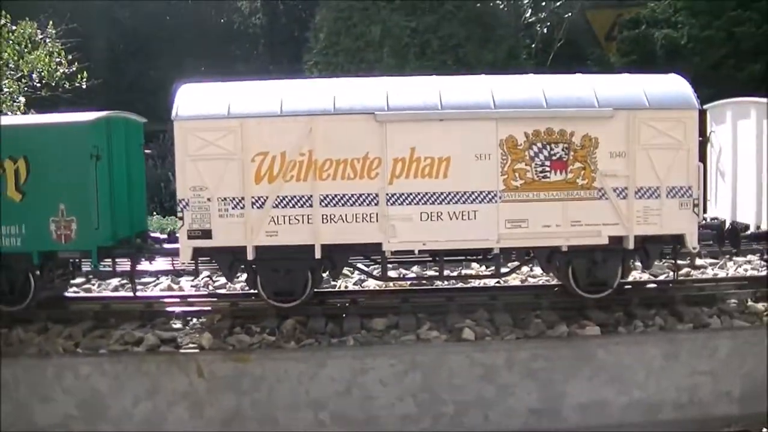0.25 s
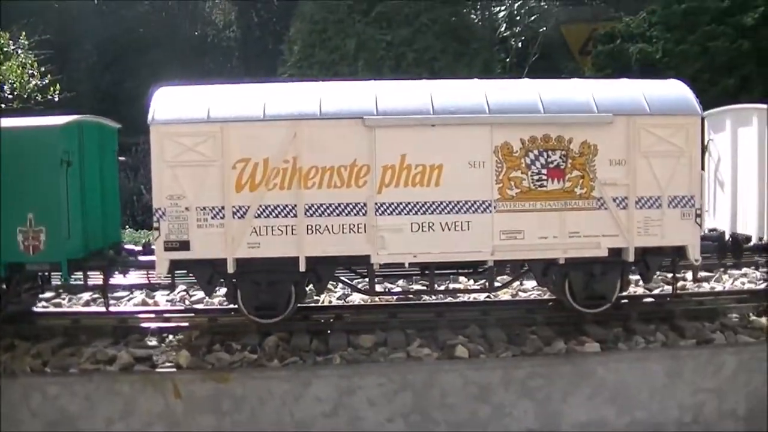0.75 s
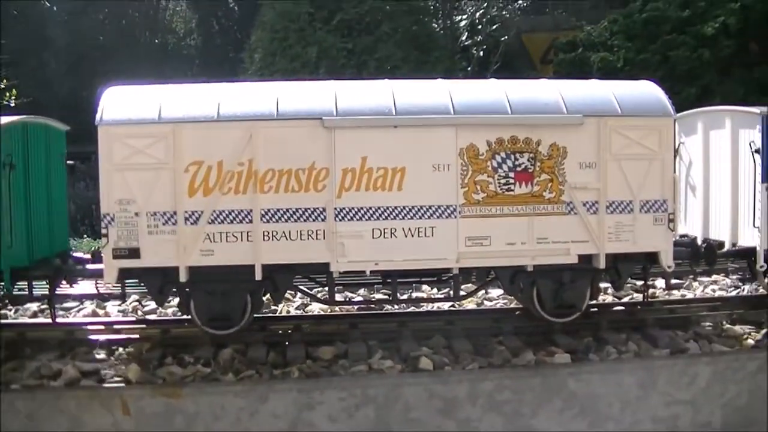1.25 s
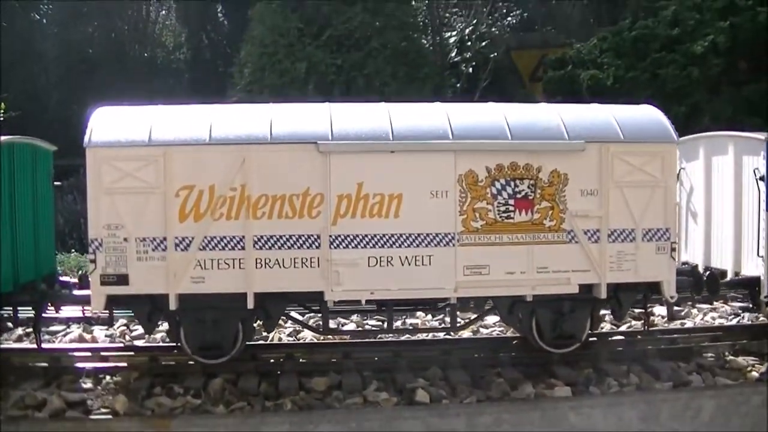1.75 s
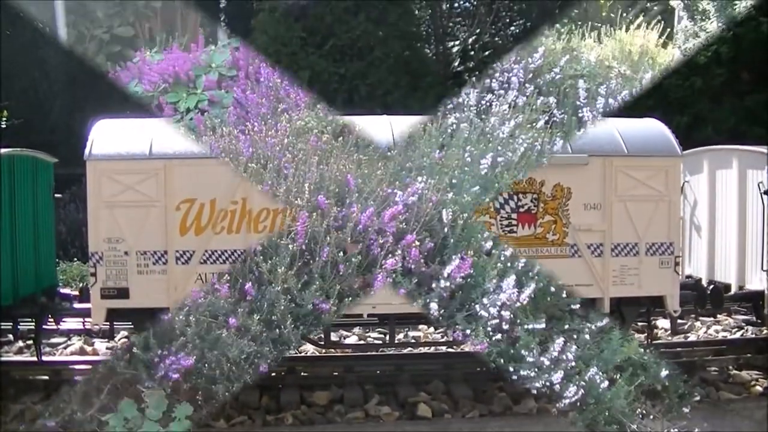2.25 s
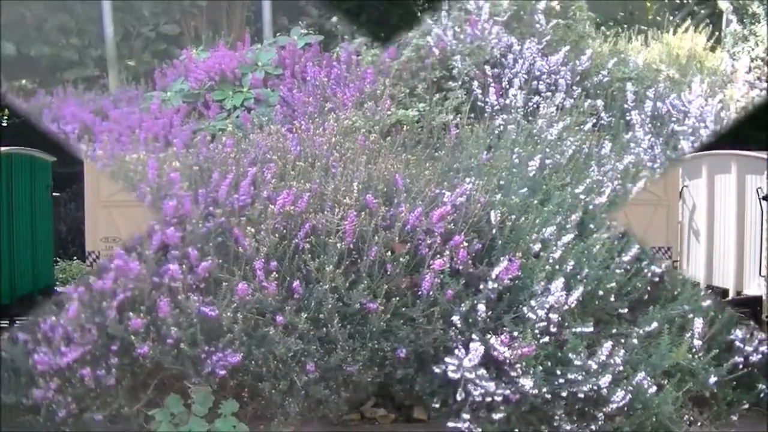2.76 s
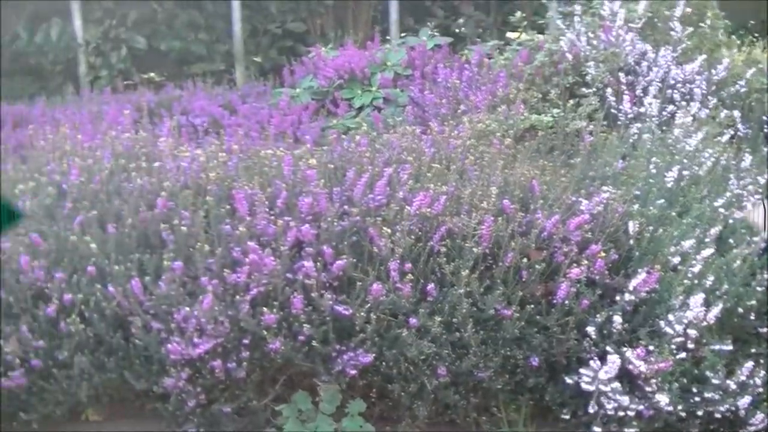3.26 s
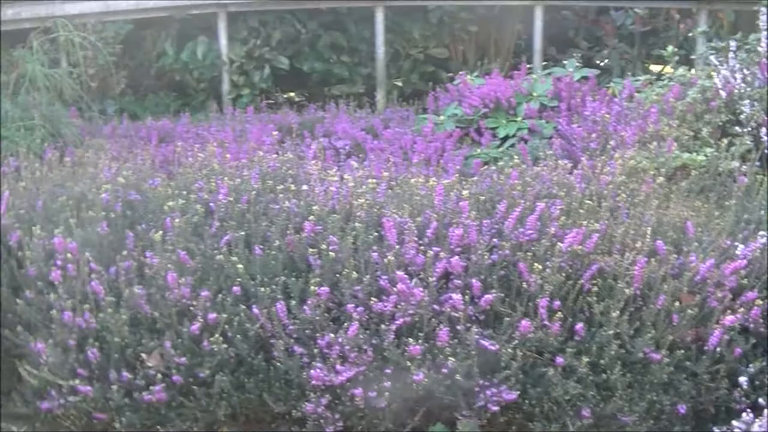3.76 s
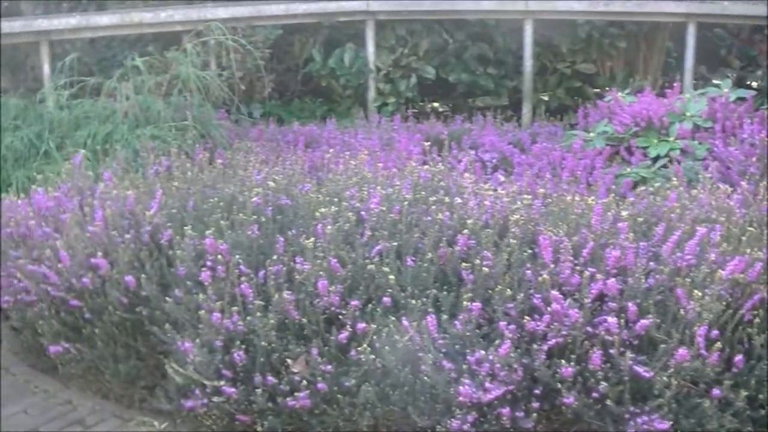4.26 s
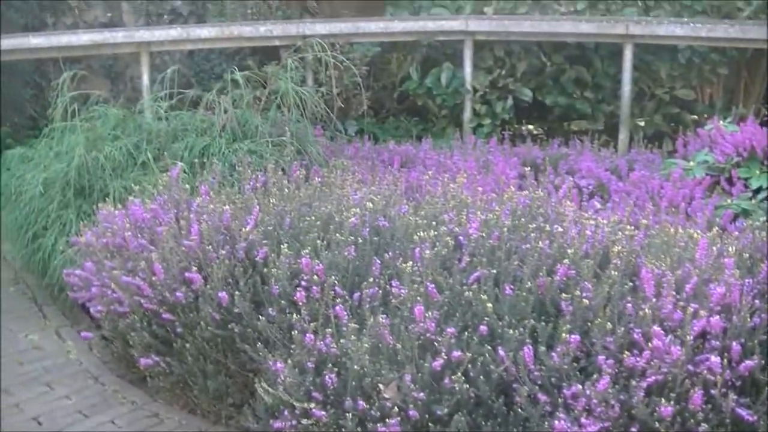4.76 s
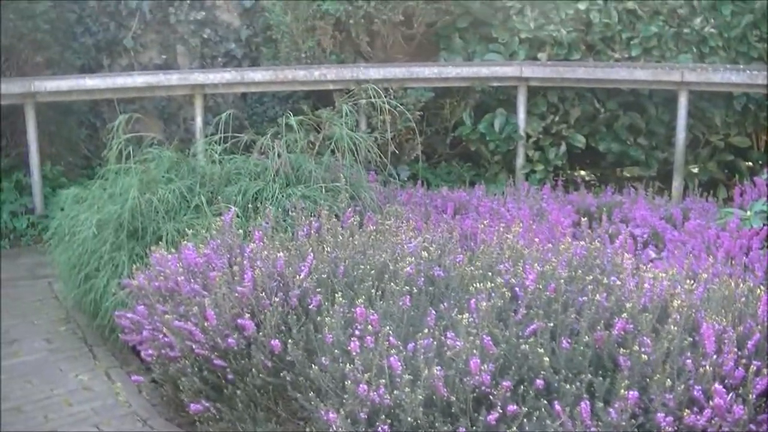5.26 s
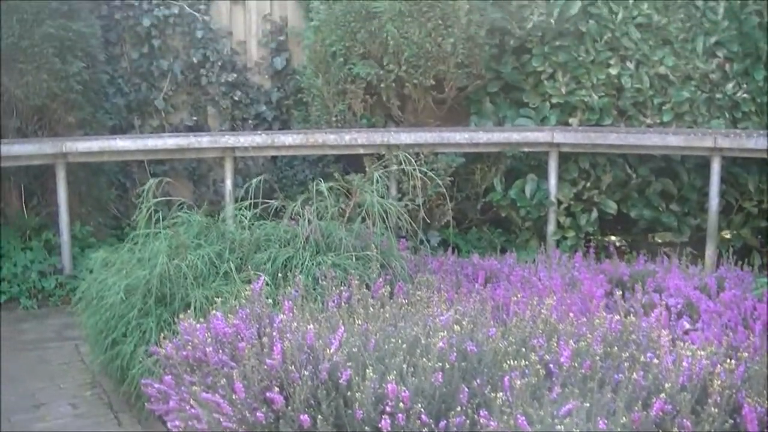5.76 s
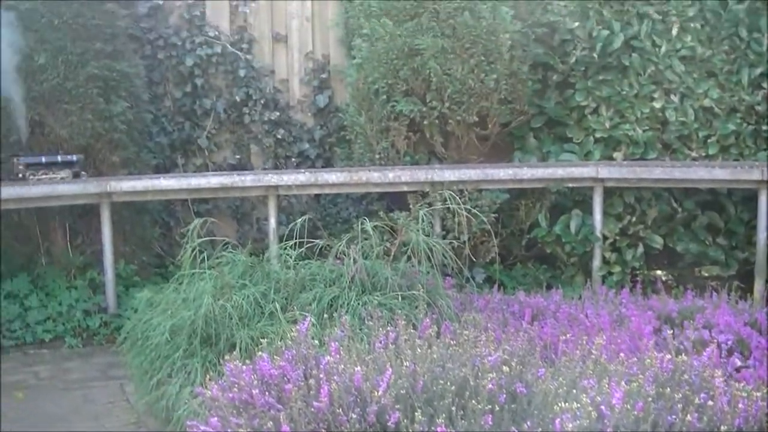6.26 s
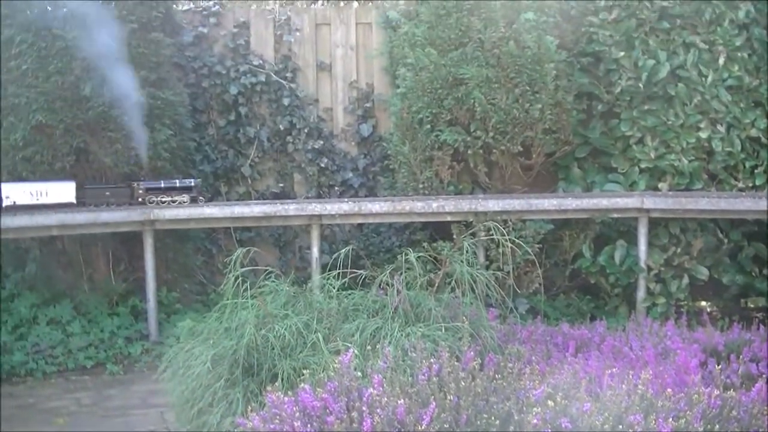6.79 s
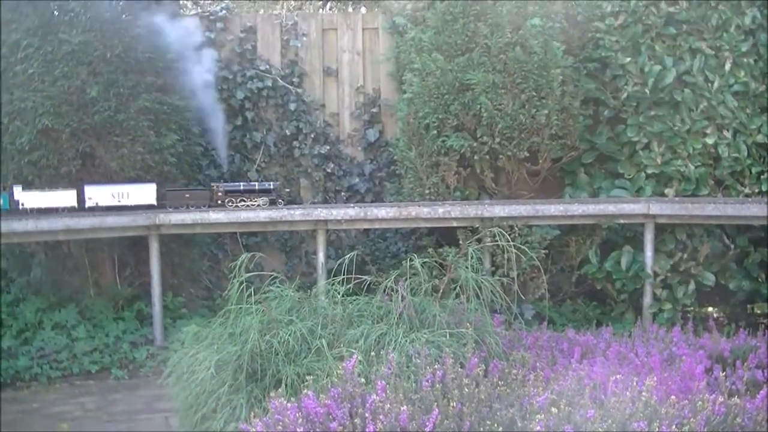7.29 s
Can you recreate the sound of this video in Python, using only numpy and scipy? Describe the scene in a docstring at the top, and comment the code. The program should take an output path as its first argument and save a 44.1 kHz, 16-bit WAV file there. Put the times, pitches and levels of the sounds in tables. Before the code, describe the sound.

Close blackbird whistles and twitters over faint rolling model wagons, then a small steam engine hisses in wet, sputtering spurts with sharp spitting pops.

```python
"""A garden railway, heard in two views. First, wagon wheels and a faint whine: coloured turbulent noise and
a narrow resonance. Close by, a blackbird whistles and twitters (gliding tones, roughened by random
modulation); seesaw calls, chatter and a trill come from far off. Then the air brightens for a wider view: a
live-steam engine with a rushing burner (noise and flue resonances), spurts of wet steam (gated jet noise
with droplet impulses) and water spitting on hot metal (noise snaps with damped sines)."""
import sys
import numpy as np
from scipy import signal
from scipy.fft import rfft, irfft, next_fast_len
from scipy.io import wavfile
from scipy.ndimage import uniform_filter1d, map_coordinates

SR = 44100
rng = np.random.default_rng(int(sys.argv[2]) if len(sys.argv) > 2 else 0)


def dump(signal):
    """Clip the signal to [-1, 1] and save it as 16-bit WAV at the path in sys.argv[1]."""
    limited = np.clip(np.atleast_2d(signal).T, -1, 1)
    pcm = np.round(limited * 32767).astype(np.int16)
    wavfile.write(sys.argv[1], SR, pcm)


N = 332073


def amp(db):
    """Decibel law: a level in dB as a linear gain."""
    return 10 ** (np.asarray(db) / 20)


def unit(x):
    """Energy normalisation: scale to rms 1."""
    return x / np.sqrt(np.mean(x ** 2) + 1e-20)


def along(points, hz):
    """Logarithmic frequency scale: interpolate (f/Hz, value) points."""
    f, v = np.transpose(points)
    return np.interp(np.log(hz + 1), np.log(f + 1), v)


def clock():
    """Uniform sampling: the time of every sample, in s."""
    return np.arange(N) / SR


def curve(rows):
    """Linear interpolation: (t/s, value) points to one value per sample."""
    return np.interp(clock(), *np.transpose(rows))


def ramp(start, length):
    """Linear onset: 0 before start, 1 after start + length."""
    return np.clip((clock() - start) / max(length, 1e-4), 0, 1)


def bump(centre, width):
    """Gaussian envelope of height 1, falling to 1/e at width from its centre."""
    return np.exp(-((clock() - centre) / width) ** 2)


def wobble(rate, size=N):
    """Band-limited fluctuation: a smooth curve through random knots, rate of them a second."""
    knots = rng.standard_normal(int(size * rate / SR) + 4)
    return map_coordinates(knots, [np.arange(size) * rate / SR])


def filtered(x, response):
    """Convolution theorem: multiply the spectrum of x by a response of frequency."""
    m = next_fast_len(N + SR // 2)
    return irfft(rfft(x, m) * response(np.fft.rfftfreq(m, 1 / SR)), m)[..., :N]


def add(track, s, sound):
    """Superposition: mix a sound into a track at s seconds."""
    part = track[..., max(round(s * SR), 0):][..., :sound.shape[-1]]
    part += sound[..., :part.shape[-1]]


# left-right correlation in the wide view: (f/Hz, correlation)
WIDE_CORRELATION = [(40, 1), (130, 0.66), (200, 0.15), (400, 0.87), (700, .92), (3200, 0.82), (4500, 0.96),
                    (5500, 0.43), (7400, 0.56), (8800, 0.62), (10500, 0.01), (11800, 0.14), (14000, -0.59)]
# left minus right in the wide view: (f/Hz, level difference/dB)
WIDE_BALANCE = [(400, 0), (3100, 1.5), (3600, 0), (4900, -2), (6100, 6), (7000, -1.5), (7700, 2),
                (8400, -2.5), (9700, -7.5), (10700, 2), (12000, -2.5), (15000, 0.5)]


def spread(pair, spectrum, correlation=WIDE_CORRELATION, balance=WIDE_BALANCE):
    """Interchannel coherence: colour two independent signals and mix them as mid and side, rms 1."""
    def mid_side_gains(hz):
        angle = np.arccos(np.clip(along(correlation, hz), -.9, 1)) / 2
        return amp(along(spectrum, hz)) * [np.cos(angle), np.sin(angle)]

    def left_right_gains(hz):
        return amp(np.outer([.5, -.5], along(balance, hz)))

    mid, side = filtered(pair, mid_side_gains)
    return unit(filtered(np.array([mid + side, mid - side]), left_right_gains))


def turbulence(patchy_db):
    """Intermittency: two noises share patches of gain that drift over time and frequency, rms 1."""
    z = signal.stft(rng.standard_normal((2, N)), nperseg=512)[2]
    field = uniform_filter1d(rng.standard_normal(z.shape[1:]), size=4, axis=0)
    field = uniform_filter1d(field, size=14, axis=1)
    return unit(signal.istft(z * amp(patchy_db * unit(field)), nperseg=512)[1][:, :N])


def ring(hz, width_hz):
    """Resonance: noise through a narrow peak whose gain halves width_hz from its centre, rms 1."""
    noise = rng.standard_normal(N)
    return unit(filtered(noise, lambda f: 1 / (1 + ((f - hz) / width_hz) ** 2)))


BREEZE_DB = -73  # between gusts
# passing gusts, added to the breeze: (t/s, half-width/s, peak gain/dB)
GUSTS = [(2.8, 0.19, -55.5), (5.48, 0.19, -59), (7.4, .15, -71)]
# colour of the low wind rumble: (f/Hz, relative level/dB)
RUMBLE = [(15, -23), (35, -8), (65, -1.5), (150, -2.5), (280, -3.5), (500, -29), (1000, -79)]


def breeze():
    """Wind noise: low-frequency noise flutters at random and swells in gusts."""
    wind = amp(BREEZE_DB) + sum(amp(db) * bump(s, width) for s, width, db in GUSTS)
    return wind * amp(3.1 * wobble(11)) * spread(rng.standard_normal((2, N)), RUMBLE)


# left-right correlation beside the wagons: (f/Hz, correlation)
NEAR_CORRELATION = [(40, 0.99), (700, 0.86), (1100, 0.78), (1800, 0.93), (3300, 0.7), (4400, 0.89),
                    (5500, 0.49), (7000, .15), (7800, 0.32), (11000, .15), (15000, .7)]
# left minus right beside the wagons: (f/Hz, level difference/dB)
NEAR_BALANCE = [(2500, .5), (3900, 0), (5200, 0.5), (5900, 5), (7000, 0)]
# colour of the air beside the wagons: (f/Hz, relative level/dB)
NEAR_AIR = [(15, -52), (25, -29), (75, -8.5), (239, -3.5), (445, -11), (603, -12), (634, -19.5),
            (751, -12.5), (803, -17.5), (1400, -23), (1820, -51), (3080, -120)]


def near_air():
    """Ambient noise: a steady, mostly low murmur beside the wagons."""
    return amp(-59.0) * spread(turbulence(patchy_db=1.0), NEAR_AIR, NEAR_CORRELATION, NEAR_BALANCE)


# colour of the air in the wide view: (f/Hz, relative level/dB)
WIDE_AIR = [(15, -49), (30, -34), (60, -22), (133, -13), (200, -9.5), (310, -8), (400, -6.5), (560, -4.5),
            (812, -11.5), (1200, -11.5), (2090, -5.5), (4820, -5), (10300, -26.5), (13800, -27),
            (15800, -44)]


def wide_air():
    """Ambient noise: the brighter air of the wide view."""
    return amp(-42.5) * spread(turbulence(patchy_db=2.05), WIDE_AIR)


WAGONS_DB = -54
# colour of wheels on rails: (f/Hz, relative level/dB)
ROLLING = [(710, -55), (1200, -35), (1240, -18), (1510, -11.5), (1640, -4), (1770, -4.5), (2200, -6.5),
           (2470, -8), (3420, -7), (4380, -4.5), (4720, -5), (6320, -12.5), (6810, -18), (14500, -24.5),
           (15800, -34)]
# a faint high whine beside the wagons: (f/Hz, level/dB)
WHINE = (7830, -77)


def wagons():
    """Rolling noise: wheels on rails as a coloured, slightly unsteady noise, with a narrow-band whine."""
    grain = turbulence(patchy_db=1)
    wheels = amp(WAGONS_DB + .4 * wobble(13.4)) * spread(grain, ROLLING, NEAR_CORRELATION, NEAR_BALANCE)
    whine_hz, whine_db = WHINE
    return wheels + amp(whine_db) * ring(whine_hz, width_hz=20)


WIDE_VIEW_S = 2.385  # the wider view begins


def background():
    """Crossfade: wagons and near air give way to wide air, with one breeze throughout."""
    wide = ramp(WIDE_VIEW_S, 0.0023)
    return (1 - wide) * (wagons() + near_air()) + wide * wide_air() + breeze()


def voice(contour, rasp, warble_hz=0, rasp_rate=650, warble_rate=44, edge=0.012, overtone_db=-42,
          flutter_db=2.0, throb_db=2):
    """Modulated whistle along (t/s, f/Hz, level/dB): warble is FM with throb, rasp is random modulation."""
    s, pitch, db = np.transpose(contour)
    on = np.arange(max(round(s[0] * SR), 0), min(round(s[-1] * SR), N))
    t = on / SR
    depth = np.broadcast_to(warble_hz, N)[on]
    beat = np.sin(2 * np.pi * warble_rate * t + 0.83 * wobble(36.0, len(t)))
    phase = 2 * np.pi * np.cumsum(np.interp(t, s, pitch) + depth * beat) / SR
    share = np.clip(rasp, 0, 1)
    breadth = rasp_rate * pitch.mean() / 2500  # high notes scatter more widely
    scatter = (wobble(breadth, len(t)) + 1j * wobble(breadth, len(t))) / np.sqrt(2)
    fundamental = (np.sqrt(1 - share ** 2) + share * scatter) * np.exp(1j * phase)
    tone = fundamental + amp(overtone_db) * np.exp(2j * phase)
    swell = np.sin(np.pi / 2 * np.clip(np.minimum(t - s[0], s[-1] - t) / edge, 0, 1))
    level = np.interp(t, s, db) + flutter_db * wobble(82.4, len(t)) - throb_db * beat * (depth > 20)
    out = np.zeros(N)
    out[on] = np.sqrt(2) * tone.real * swell * amp(level)
    return out


TRILL_START_S, TRILL_END_S, TRILL_PER_S = 1.06, 2.26, 23.5
TRILL_HZ, TRILL_DB, TRILL_NOTE_S = 4850, -57, 0.02  # level before scatter


def trill(jitter_s=.003, scatter_db=1.5):
    """Quasi-periodic repetition: one short note recurs quickly, uneven in time and level."""
    times = np.arange(TRILL_START_S, TRILL_END_S, 1 / TRILL_PER_S)
    track = np.zeros(N)
    for time, (late, loud) in zip(times, rng.standard_normal((len(times), 2))):
        s, db = time + jitter_s * late, TRILL_DB + scatter_db * loud
        track += voice([(s, TRILL_HZ, db), (s + TRILL_NOTE_S, TRILL_HZ, db)], rasp=.55)
    return track


# a far bird's high and low notes: (first t/s, length/s, f/Hz, relative level/dB, repeats)
SEESAW = [(.025, 0.18, 4510, -50, 4), (.315, .27, 3894, -51.7, 3)]
SEESAW_PERIOD_S = .385


def seesaw():
    """Periodic alternation: two nearly level, fluttering notes take turns at a steady pace."""
    track = np.zeros(N)
    for first, length, hz, db, repeats in SEESAW:
        for k in range(round(repeats)):
            s = first + k * SEESAW_PERIOD_S
            contour = [(s, hz + 12, db - 1.5), (s + length / 3, hz, db), (s + length, hz - 8, db - 6.5)]
            track += voice(contour, rasp=0.36, rasp_rate=210, flutter_db=2.1)
    return track


# far chatter dying away: (t/s, f/Hz, relative level/dB)
CHATTER = [(0, 3760, -46), (.09, 3840, -48), (.15, 3600, -56), (.39, 3640, -56.5)]


def chatter():
    """Narrow-band noise: a very raspy voice glides and dies away."""
    return voice(CHATTER, rasp=0.92, rasp_rate=850)


# the blackbird's twitter: short glides, some overlapping:
# (t/s, length/s, start f/Hz, end f/Hz, relative level/dB)
TWITTER = [(2.54, .062, 3930, 3880, -33.5), (2.532, .07, 5130, 5000, -51.5),
           (2.633, 0.037, 3370, 3440, -28.5), (2.675, .03, 3420, 3600, -32),
           (2.666, 0.022, 4400, 4350, -24.5), (2.689, 0.02, 4260, 4060, -27)]


def twitter():
    """Frequency glide: short, nearly pure notes with a faint second harmonic."""
    return sum(voice([(s, start, db), (s + length, end, db)], rasp=0.2, edge=0.0041, overtone_db=-28.5)
               for s, length, start, end, db in TWITTER)


# slurred chips: (t/s, length/s, start f/Hz, middle f/Hz, end f/Hz, relative level/dB, rasp 0-1)
CHIPS = [(0.596, 0.054, 2620, 2480, 1590, -45, 0.4), (0.708, .07, 5960, 5540, 5650, -56.5, .9),
         (1.029, 0.068, 2660, 2160, 1760, -45, 0.9), (1.483, 0.058, 2665, 2284, 1820, -39, 0.93),
         (2.5, 0.049, 3430, 3800, 3770, -37.5, .85), (2.596, .065, 3700, 3620, 3820, -30, .95),
         (2.615, .04, 4900, 5050, 4950, -37.5, .7), (2.708, .059, 4110, 3760, 3570, -30, 1),
         (2.752, 0.053, 3390, 3700, 3780, -35, 1), (2.794, 0.062, 3820, 3710, 3620, -43, 1),
         (2.849, .07, 6700, 6250, 5600, -43, .8), (2.88, 0.019, 5100, 4960, 4800, -30, .65),
         (3.095, 0.034, 1940, 1880, 1840, -39.5, .3), (7.417, .048, 3290, 2810, 2390, -33.5, 0.97)]


def chips():
    """Random modulation: each chip is a roughened glide, loudest in its middle."""
    track = np.zeros(N)
    for s, length, start, middle, end, db, rasp in CHIPS:
        contour = [(s, start, db - 3), (s + length / 2, middle, db), (s + length, end, db - 6)]
        track += voice(contour, rasp, rasp_rate=680, edge=0.0056)
    return track


# the blackbird's arch, long swelling rise and closing fall: (t/s, f/Hz, relative level/dB)
ARCH = [(0.775, 1790, -51), (0.795, 1800, -43), (0.811, 1990, -51), (0.853, 2096, -34), (0.871, 1910, -49),
        (0.883, 1812, -36.5), (0.935, 1730, -46), (0.945, 1740, -50)]
RISE = [(1.69, 1795, -57), (1.706, 1760, -37), (1.738, 1870, -51), (1.768, 1920, -38.5), (1.838, 2340, -31),
        (1.842, 2310, -37), (1.9, 2390, -25.5), (1.942, 2466, -33.5), (1.962, 2510, -28),
        (1.972, 2510, -41), (1.978, 2544, -32), (2.006, 2410, -49), (2.042, 2290, -30), (2.066, 2268, -40),
        (2.078, 2270, -28.5), (2.106, 2283, -32), (2.116, 2280, -43), (2.18, 2266, -39)]
FALL = [(2.175, 1940, -48), (2.213, 1973, -41.5), (2.343, 1773, -38.5), (2.385, 1705, -49)]
# the rise quavers on its way up: (t/s, half-width/s, depth/Hz)
QUAVER = (1.82, .038, 230)
# buzz, two voices at once:
# (t/s, length/s, f/Hz, first relative level/dB, last relative level/dB, initial warble depth/Hz, rasp 0-1)
BUZZ = [(1.205, 0.23, 1830, -46.5, -35, 107, .25), (1.2, 0.16, 2690, -50, -53.5, 98, 0.7)]
BUZZ_SETTLES = 0.75  # share of the warble that is gone by the end of the buzz


def blackbird():
    """Frequency modulation: clear whistles, and a two-voiced buzz whose warble steadies."""
    at, width, depth_hz = QUAVER
    arch = voice(ARCH, rasp=.04, flutter_db=0.9)
    rise = voice(RISE, rasp=.08, warble_hz=depth_hz * bump(at, width), warble_rate=75,
                 flutter_db=1.8, throb_db=4.0)
    fall = voice(FALL, rasp=.2, warble_hz=26)
    buzz = np.zeros(N)
    for s, length, hz, first_db, last_db, warble, rasp in BUZZ:
        settling = warble * (1 - BUZZ_SETTLES * ramp(s, length))
        buzz += voice([(s, hz, first_db), (s + length, hz, last_db)], rasp, warble_hz=settling, throb_db=3)
    return amp(-0.1) * (arch + rise + fall) + amp(-1.2) * buzz


# reverberation time of the garden: (f/Hz, T60/s)
GARDEN = [(300, 0.19), (2500, 0.5), (10000, 0.29)]


def garden(x, delay=.008):
    """Diffuse reverberation: hedges and fences return a short tail of decaying noise."""
    hz, t, z = signal.stft(rng.standard_normal((2, SR // 2)), SR, nperseg=256)
    tail = signal.istft(z * amp(-60 * t / along(GARDEN, hz)[:, None]), SR, nperseg=256)[1]
    late = np.pad(x, (int(abs(delay) * SR), 0))
    return signal.fftconvolve(late[None], tail / np.linalg.norm(tail[0]), axes=1)[:, :N]


def birds():
    """Direct-to-reverberant ratio: near song is dry, far calls washed out and flickering in moving air."""
    near = blackbird() + chips() + twitter()
    far = seesaw() + chatter()
    washed = (far + amp(-6) * garden(far)) * amp(2 * wobble(45))
    return near + amp(-10.5) * garden(near) + amp(-4) * washed + trill()


FLAME_DB, SCREEN_DB = -46, -7.5  # the flame in the open; its change behind the plants
EMERGES_S, EMERGE_LENGTH_S = 5.2, 0.11  # the engine comes out from behind the plants
# colour of the flame: (f/Hz, relative level/dB)
FLAME = [(120, -32), (200, -12), (260, -23), (303, -8.5), (352, -14), (429, -15.5), (574, -2.5), (822, 7.5),
         (1160, -2), (1900, -8.5), (2470, -50), (4180, -120)]
# hollow tones of the flue: (f/Hz, half-width/Hz, level/dB)
FLUE = [(310, 28, -64), (590, 48, -58.5)]


def burner():
    """Combustion noise with flue resonances: the flame grows louder as the engine leaves the plants."""
    level_db = FLAME_DB + SCREEN_DB * (1 - ramp(EMERGES_S, EMERGE_LENGTH_S))
    flame = amp(level_db + .4 * wobble(12)) * spread(turbulence(patchy_db=0.5), FLAME)
    flue = sum(amp(db) * ring(hz, width) for hz, width, db in FLUE)
    return ramp(WIDE_VIEW_S, 0.0045) * (flame + flue)


def droplets(rate, scatter_db):
    """Shot noise: tiny random impulses of very uneven size, rms 1."""
    struck = rng.random((2, N)) < rate / SR
    size = amp(scatter_db * np.clip(rng.standard_normal((2, N)), -2, 2))
    return unit(struck * size * rng.choice([-1, 1], (2, N)))


SPURT_RISE_S, SPURT_FADE_S = 0.0055, 0.027  # shortest rise; shortest decay of amplitude to 1/e
SLUGGISH = 0.094  # share of a spurt's length added to both


def spurt(opens, length):
    """Exponential relaxation: the power of one spurt builds, holds and dies away."""
    lag = SLUGGISH * length
    closed_for = np.maximum(clock() - opens - length, 0)
    return ramp(opens, SPURT_RISE_S + lag) * np.exp(-2 * closed_for / (SPURT_FADE_S + lag))


# spurts of wet steam: (opening t/s, length/s, relative level/dB)
SPURTS = [(2.917, 0.8, -30.5), (3.847, 0.063, -32), (3.959, 0.23, -31.5), (4.22, 0.32, -31),
          (4.626, 0.5, -31.5), (5.155, 0.11, -35), (5.449, 0.077, -31), (5.596, 0.24, -31),
          (5.88, 0.032, -33.5), (6.067, 0.13, -31), (6.472, 0.092, -31), (6.689, 0.067, -31),
          (6.953, 0.037, -34), (7.114, .13, -32.8), (7.353, 0.16, -32)]
VALVE_OPENS_S = 2.93
# steady dry steam: (t/s, relative level/dB)
LEAK = [(2.93, -44), (4.6, -39), (5.35, -42), (6.4, -42), (7.53, -42)]
# colours of wet steam before and after the curve, and of dry steam: (f/Hz, relative level/dB)
STEAM_EARLY = [(760, -30), (1300, -33.5), (1850, -9.5), (2100, -16), (2560, -4.5), (4560, 1), (5390, -2.5),
               (6100, 0), (6850, -10.5), (7520, -3.5), (8800, -9), (9670, -9.5), (10500, -20), (12800, -15),
               (15800, -69)]
STEAM_LATE = [(760, -35), (1300, -15.5), (1780, -9), (2150, -9), (2700, -7.5), (3000, -6), (4460, -0.5),
              (5060, 0.5), (6780, -12.5), (8990, -4.5), (10700, -12.5), (12400, -18), (13600, -17),
              (14800, -17), (15800, -18.5)]
STEAM_DRY = [(710, -20), (1200, -19), (1400, -5), (1950, -11.5), (2270, 1.5), (2750, -13), (3130, -0.5),
             (4190, -2.5), (4520, 4), (6890, -6.5), (9020, 3), (9940, -1), (10900, -6), (15100, -7),
             (15800, -23)]
# the jet's hollow ring: (f/Hz, half-width/Hz, level/dB relative to the jet)
NOZZLE = [(4600, 130, -30), (4960, 110, -17)]
# reflections from the track deck and the fence: (delay/s, relative strength)
JET_ECHOES = [(.00114, 0.11), (.00175, 0.031), (.0043, .12), (.0091, 0.4)]


def steam():
    """Jet noise: a dry hiss and droplet-laden spurts; the colour shifts as the engine rounds the curve."""
    power = sum(amp(db) ** 2 * spurt(opens, length) for opens, length, db in SPURTS)
    flow = np.sqrt(power) * amp(.45 * wobble(18) + .6 * wobble(110))
    jet = turbulence(patchy_db=2.1) + amp(-9.5) * droplets(rate=900, scatter_db=5)
    turned = ramp(4.46, 1.47)
    hollow = sum(amp(db) * ring(hz, width) for hz, width, db in NOZZLE)
    wet = (1 - turned) * spread(jet, STEAM_EARLY) + turned * (spread(jet, STEAM_LATE) + hollow)
    leak = ramp(VALVE_OPENS_S, 0.011) * amp(curve(LEAK))
    hiss = flow * wet + leak * spread(turbulence(patchy_db=3.5), STEAM_DRY)

    def reflections(hz):
        return sum(gain * np.exp(-2j * np.pi * hz * delay) for delay, gain in JET_ECHOES)

    # echoes comb the hiss, more strongly as the engine turns
    return amp(-0.7) * (hiss + (0.29 + 0.74 * turned) * filtered(hiss, reflections))


# water spitting on hot metal: (t/s, mean peak level/dB, f/Hz, knock level relative to the tone/dB)
SPITS = [(4.335, -17.5, 4640, -5), (5.3879, -21, 3570, 1), (5.4225, -14.5, 3200, -1),
         (6.9224, -21.5, 3140, 1), (7.098, -6.5, 4820, -3.5), (7.348, -10, 4170, -5)]


def spits(life=0.0061, snap_db=-0.5, knock_hz=2900, snap_life=0.0048, reach=2.23):
    """Damped oscillation: a drop bursts with a broad snap, a decaying tone and a knock of the chimney."""
    # life and snap_life are 60 dB decay times in s
    out = np.zeros((2, N))
    t = np.arange(SR // 50) / SR
    for s, db, hz, knock_db in SPITS:
        top_hz = np.clip(hz * reach, 4000, 14000)  # low pops are also duller
        band = signal.butter(3, [2500, top_hz], "bandpass", fs=SR, output="sos")
        snap = unit(signal.sosfilt(band, rng.standard_normal(len(t)))) * amp(snap_db - 60 * t / snap_life)
        knock = amp(knock_db) * np.sin(2 * np.pi * knock_hz * t)
        body = (np.sin(2 * np.pi * hz * t) + knock) * amp(-60 * t / life)
        pop = (snap + body) * (1 - np.exp(-t / 0.00042))
        balance = amp([[-1.1], [1.1]])  # each spit is slightly louder on the right
        add(out, s + 0.00039, amp(db) * pop / np.abs(pop).max() * balance)
    return out


def scene():
    """Superposition: everything heard in the garden."""
    return background() + birds() + burner() + steam() + spits()


TOP_HZ = 15800


def record(dry):
    """Band limitation: nothing remains at or above the top frequency."""
    return filtered(dry, lambda hz: hz < TOP_HZ)


dry = scene()
out = record(dry)
dump(out)
```